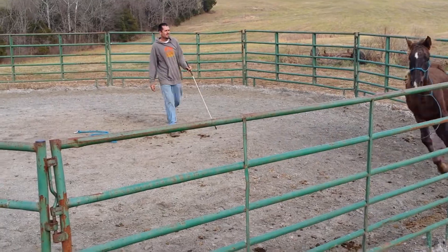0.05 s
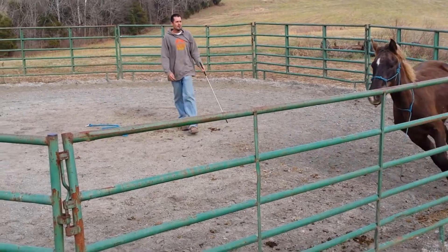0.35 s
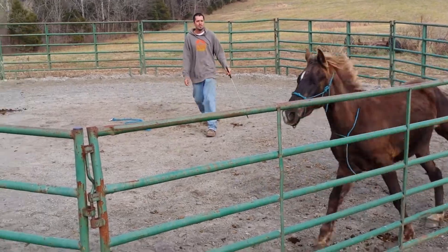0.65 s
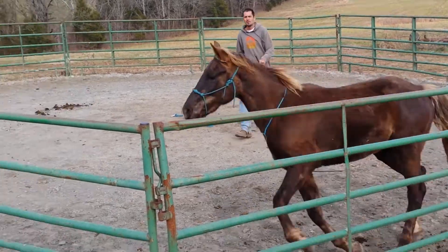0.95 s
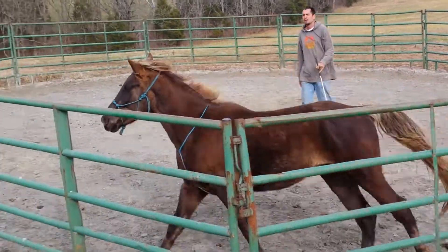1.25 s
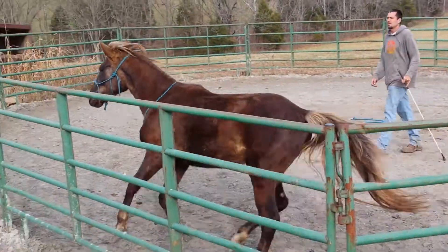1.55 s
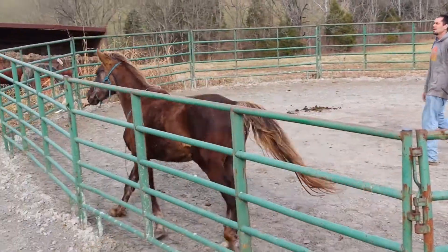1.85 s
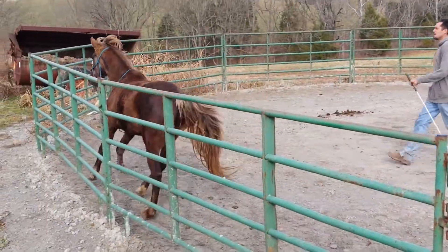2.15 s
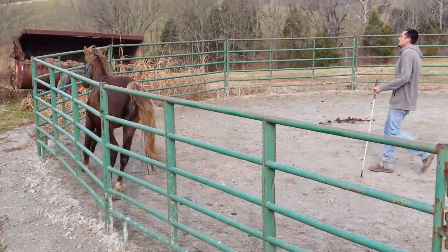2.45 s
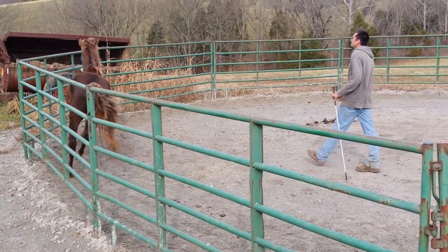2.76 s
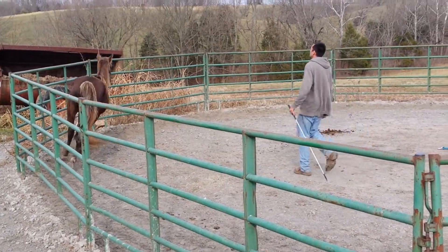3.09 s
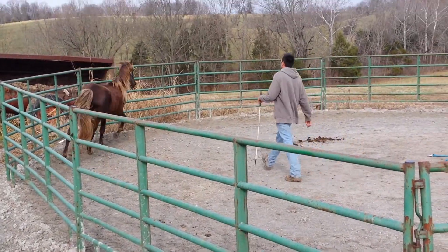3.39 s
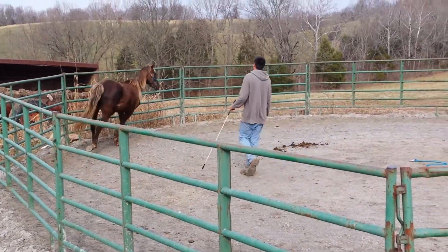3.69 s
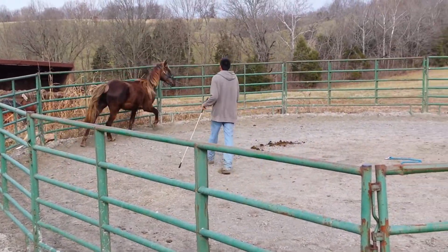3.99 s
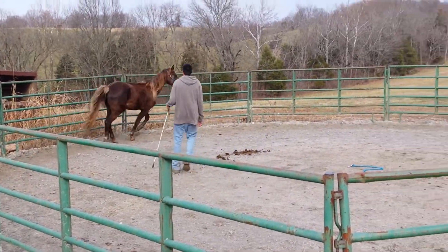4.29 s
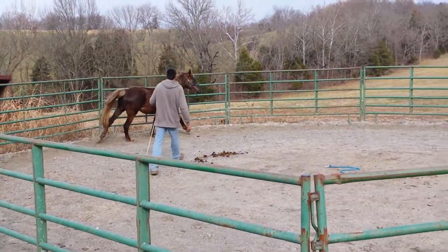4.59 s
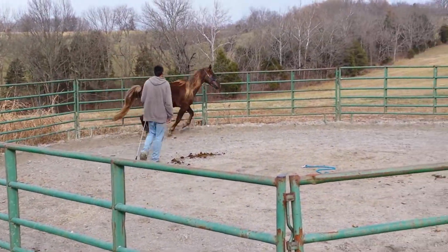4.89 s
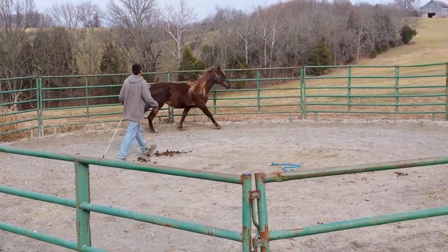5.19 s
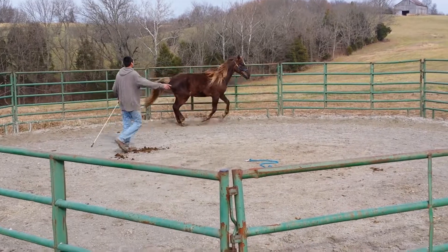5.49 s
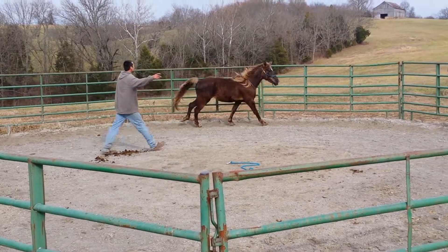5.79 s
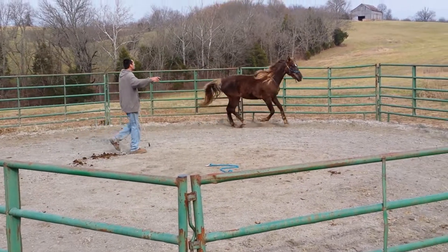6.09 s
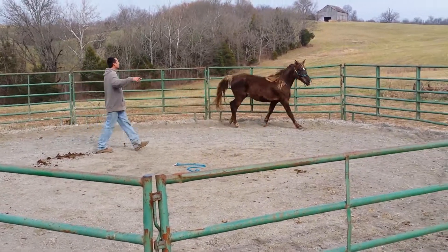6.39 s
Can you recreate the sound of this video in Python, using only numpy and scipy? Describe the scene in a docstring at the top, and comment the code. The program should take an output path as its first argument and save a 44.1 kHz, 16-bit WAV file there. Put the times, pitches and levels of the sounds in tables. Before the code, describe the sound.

Wind gusts rumble on the microphone as hooves crunch past on sand, followed by a long, far-off whinny and one whip snap.

```python
"""A sandy pen below a wooded hillside, heard through the two microphone ports of a hand-held camera.
A horse canters past close by, then moves off to the far side, each hoof thudding down and crunching
through the sand. A lunge whip snaps once. From a distance comes a long falling whinny, a high squeal
and a rough low neigh throbbing together, and the trees echo it. Gusts buffet the ports throughout,
with three short crackles at the start."""
import sys
import numpy as np
from scipy import signal
from scipy.fft import rfft, irfft, next_fast_len
from scipy.io import wavfile
from scipy.ndimage import uniform_filter1d, map_coordinates

SR = 44100
rng = np.random.default_rng(int(sys.argv[2]) if len(sys.argv) > 2 else 0)


def waveform_to_disk(signal):
    """Save audio, clipped to [-1, 1], as 16-bit WAV at the path in sys.argv[1]."""
    frames = np.transpose(np.atleast_2d(signal))
    scaled = np.clip(frames, -1, 1) * 32767
    samples = np.round(scaled).astype(np.int16)
    wavfile.write(sys.argv[1], SR, samples)


N = 293204

# The open air: far rumble, breeze, dry grass. Each row: frequency in Hz, relative level in dB.
FAR_RUMBLE_SPECTRUM = [(20, 2.5), (50, 9), (90, 8), (150, -8.5), (260, -6), (420, -5.5), (750, -23),
                       (1200, -18.5), (3000, -30)]
BREEZE_SPECTRUM = [(200, 7.5), (500, -0.5), (750, -4.5), (950, 0), (1100, -6), (1250, 2), (1380, -10),
                   (1550, -15), (1720, -2.5), (1880, 4), (2020, 1), (2170, 4), (2400, -1.5), (2600, -5),
                   (3600, -10), (6000, -17.5), (12000, -23.5)]
RUSTLE_SPECTRUM = [(1500, -3), (3300, 1), (5500, 1.5), (6600, 3.5), (7700, 13.5), (8800, 4.5),
                   (11000, -2.5), (14500, -11.5)]
# Breeze round the pen; loose sand and dry grass. Each row: time in seconds, relative level in dB.
BREEZE_LEVEL = [(0.0, -61.5), (0.4, -55.5), (0.66, -51.5), (0.82, -67.5), (1.08, -64), (1.2, -54.5),
                (1.86, -63.5), (1.99, -67), (2.4, -73), (2.55, -66), (2.78, -74.5), (3.11, -59.5),
                (3.46, -55), (3.65, -53.5), (3.73, -67), (4.6, -72)]
RUSTLE_LEVEL = [(0.0, -62), (0.64, -56), (0.76, -63), (1.06, -61.5), (1.3, -53), (1.81, -50.5),
                (1.92, -59.5), (2.7, -62), (4.02, -59), (4.49, -63.5), (5.6, -61.5)]
# How alike the open air is at the two ports. Each row: frequency in Hz, correlation from 0 to 1.
AIR_COHERENCE = [(100, 1), (650, 0.88), (1400, 0.16), (2500, 0.0099), (6000, 0.041)]
# Echo of the hillside. Each row: frequency in Hz, t60 (time to fall 60 dB) in seconds.
WOODS_DECAY = [(500, 0.29), (1200, 0.72), (2600, 1.44), (7000, 0.92)]

# Steady push of the wind on each port. Each row: time in seconds, relative level in dB.
PUSH_LEFT = [(0, -20.5), (0.57, -19), (0.63, -45), (1.15, -44.5), (1.36, -38.5), (1.54, -45.5),
             (1.7, -33.5), (2.28, -31), (2.4, -44.5), (3.3, -46), (3.75, -38.5), (4.0, -47), (4.8, -57.5),
             (5.55, -50), (6.2, -34.5)]
PUSH_RIGHT = [(0, -19), (0.379, -23), (0.47, -46), (0.7, -46), (1.1, -31.5), (1.42, -58), (2.0, -48),
              (3.05, -48.5), (3.78, -32.5), (3.9, -38.5), (4.35, -55), (5.68, -49.5), (5.88, -26),
              (6.65, -27)]
# Gusts. Each row: start and hold in seconds, relative level in dB, port (0 left, 1 right).
PORT_GUSTS = [(0.0, 0.056, -12.5, 0), (0.0, 0.041, -33, 1), (0.16, 0.076, -19, 1), (0.268, 0.13, -20.5, 0),
              (0.397, 0.13, -22, 0), (0.524, 0.038, -23.5, 1), (0.672, 0.15, -29, 0), (0.714, .1, -24.5, 1),
              (0.84, 0.046, -25.5, 0), (0.907, 0.044, -26, 0), (0.886, 0.052, -25, 1),
              (0.967, 0.038, -21.5, 1), (1.224, 0.033, -26.5, 1), (1.282, 0.028, -28.5, 0),
              (2.035, 0.047, -26.5, 0), (2.117, 0.042, -21, 0), (2.256, 0.059, -28, 0),
              (3.091, 0.016, -23, 1), (3.12, 0.029, -34, 0), (3.188, 0.073, -21, 1),
              (3.342, 0.089, -30.5, 0), (3.388, 0.053, -24.5, 1), (3.523, 0.024, -21, 0),
              (3.698, 0.023, -16, 1), (3.76, 0.043, -38, 0), (4.029, 0.11, -38, 1),
              (4.409, 0.033, -36.5, 0), (4.903, 0.019, -40, 1), (4.928, 0.024, -18.5, 0),
              (5.03, 0.035, -43, 0), (5.116, 0.058, -33, 1), (5.375, 0.033, -44, 0),
              (5.653, 0.066, -31.5, 0), (5.815, 0.04, -14.5, 1), (5.936, 0.08, -25, 0),
              (5.947, 0.086, -28.5, 1), (6.144, 0.018, -18, 1), (6.255, 0.29, -22, 0),
              (6.309, 0.048, -14.5, 1), (6.538, 0.11, -16, 0), (6.545, 0.039, -18, 1)]
# Single eddies. Each row: peak time and half-width in seconds, level in dB, port (0 left, 1 right).
PORT_PUFFS = [(0.05, 0.0065, -6, 0), (0.166, 0.0064, -18.5, 1), (0.277, 0.0031, -15.5, 0),
              (0.4, 0.0044, -7, 0), (0.424, 0.0053, -8.5, 0), (0.465, 0.0085, -9.5, 0),
              (0.519, 0.0047, -8.5, 0), (0.545, 0.0039, -10.5, 0), (0.771, 0.013, -24.5, 1),
              (3.706, 0.0047, -21, 1), (4.952, 0.0035, -32, 0), (5.856, 0.0033, -36, 1)]
# Large and small turbulence at a port. Each row: frequency in Hz, relative level in dB.
BUFFET_SPECTRUM = [(15, -35), (30, -13.5), (60, 0.5), (110, 4.5), (170, -3), (260, -13.5), (400, -28.5),
                   (650, -51), (1200, -43.5), (3000, -117)]
EDDY_SPECTRUM = [(60, -22.5), (180, 9), (330, 1.5), (500, -9.5), (750, -22.5), (1200, -39), (2500, -66),
                 (6000, -85)]

# Snap of the whip's tip. Each row: start in seconds, level in dB.
WHIP_SNAPS = [(5.1681, -26)]
# Colour of the snap. Each row: frequency in Hz, relative level in dB.
SNAP_SPECTRUM = [(400, -10), (1800, -8), (3500, -16), (5500, -18), (6600, 0), (7300, 12), (8300, 2),
                 (10500, -6.5), (14500, -9)]

# The whinny's high voice. Each row: time in seconds, crest pitch in Hz, relative level in dB,
# dip between crests as a share of the pitch, relative overtone level in dB.
SQUEAL_CONTOUR = [(4.58, 2764, -66, .008, -25), (4.67, 2830, -52, 0, -23), (4.72, 2840, -41, .02, -17),
                  (4.8, 2832, -45.5, .06, -16.5), (4.96, 2817, -46, .12, -6), (5.11, 2720, -51.5, .13, -11),
                  (5.25, 2664, -45.5, .12, -20), (5.4, 2658, -48.5, .16, -12.5), (5.54, 2478, -50, .15, -7),
                  (5.68, 2413, -45, .22, -18.5), (5.82, 2338, -44, .23, -16), (5.96, 2217, -45, .19, -14),
                  (6.1, 2079, -42.5, .15, -15), (6.24, 1901, -44.5, .1, -16), (6.38, 1682, -49, .07, -30),
                  (6.52, 1606, -40, .06, -24), (6.65, 1565, -65, 0.066, -27)]
# Throbs of its low voice. Each row: time in seconds, pitch in Hz, relative level in dB.
NEIGH_THROBS = [(4.58, 580, -88), (4.725, 580, -101), (4.87, 585, -88), (5.02, 577.5, -50.5),
                (5.17, 569, -44), (5.31, 533, -42), (5.45, 521.4, -39.5), (5.595, 505, -39),
                (5.735, 517.4, -38.5), (5.88, 518, -37), (6.02, 510, -37), (6.16, 506.3, -36.5),
                (6.3, 510, -37), (6.445, 519.7, -38.5), (6.585, 518.4, -43.5), (6.72, 510, -56)]
# The throat shapes the neigh, the nose the squeal. Each row: frequency in Hz, gain in dB.
THROAT_RESPONSE = [(300, 2), (560, 4.5), (800, 3.5), (1150, 3), (1400, 0.5), (1800, 0.5), (2300, -6.5),
                   (2650, -14.5), (2950, -14.5), (3400, -3), (4100, -11), (4900, -17), (7000, -3.5),
                   (10000, -10.5), (14000, -53)]
NOSE_RESPONSE = [(700, 4), (1600, 4.5), (2300, 5.5), (2800, -8.5), (3100, 6), (4000, 16), (4550, 2),
                 (5200, 16), (5700, 0), (6200, 13), (7000, 24.5), (8000, -12), (10000, -22)]
# Narrow resonances of the horse's long head. Each entry: frequency in Hz.
HEAD_RESONANCES = [433.5, 542, 664, 980, 1210, 1575, 1830, 2120, 2370]

# Soft hollow knocks nearby. Each row: start in seconds, pitch in Hz, level in dB, t60 in seconds.
HOLLOW_KNOCKS = [(0.803, 402, -21.5, 0.034), (1.173, 445, -33.5, 0.11), (1.345, 380, -30.5, 0.053),
                 (2.357, 345, -28.5, 0.017), (2.481, 317, -30, 0.025), (4.443, 430, -43, 0.031),
                 (4.543, 306, -35.5, 0.068), (4.606, 275, -28.5, 0.03), (5.205, 506, -23, 0.007)]
# Flung pebbles. Each row: start in seconds, relative level in dB, pitch in Hz, t60 in seconds.
PEBBLE_TICKS = [(2.9384, -27, 7200, 0.018), (2.94, -35, 5160, .012), (3.1338, -30, 6300, 0.016),
                (3.681, -35, 8800, 0.028), (3.759, -34, 8100, .03), (3.8276, -39, 9000, .02),
                (3.839, -30.5, 8800, 0.06), (3.954, -30.5, 8560, 0.084), (4.12, -37, 7500, .04),
                (4.1465, -30, 7700, .025), (4.255, -34, 7550, 0.045), (4.345, -33, 8700, 0.028),
                (4.9244, -27, 8800, 0.031), (5.1445, -31, 7240, 0.081)]
# A hoof twisting in sand. Each row: peak time and half-width in seconds, pitch in Hz,
# glide in Hz a second, level in dB.
SAND_SQUEAKS = [(2.18, 0.0085, 810, 3400, -41.5)]
# Three short crackles of wind on the ports, then hoof falls and scuffs. Each row: start, rise and
# length in seconds, relative levels of crunch, grit and thud in dB, ring pitch in Hz.
CRACKLES_AND_HOOVES = [(0.037, .001, 0.013, -39.5, -49, -49, 870),
                       (0.152, .002, .005, -43, -44.5, -32, 2420),
                       (0.272, 0.0037, 0.019, -41, -47, -54, 1030),
                       (0.573, .005, 0.017, -45, -47, -65, 2100),
                       (0.67, .008, 0.029, -44.5, -45, -57, 2600),
                       (0.711, 0.0051, .027, -47, -47, -60, 1330),
                       (0.8, 0.00086, 0.022, -35.5, -43.5, -53, 970),
                       (1.06, .0003, 0.0018, -29.5, -29.5, -50, 1350),
                       (1.106, 0.008, 0.029, -36, -42, -61, 2630),
                       (1.22, .004, 0.046, -35, -38.5, -47, 2130),
                       (1.3413, 0.0013, 0.03, -31.5, -32.5, -41, 1310),
                       (1.401, 0.0074, 0.022, -45, -48, -61, 1680),
                       (1.585, 0.0053, 0.013, -45.5, -44, -62, 1250),
                       (1.623, 0.0041, 0.042, -35.5, -32, -57, 2470),
                       (1.707, 0.00027, .001, -42.5, -36, -59, 2540),
                       (1.748, 0.0037, 0.018, -36.5, -37, -54, 2170),
                       (1.777, .002, 0.021, -35, -36, -56, 1140), (1.842, .005, 0.018, -43, -41, -60, 1310),
                       (1.902, 0.0018, 0.02, -38.5, -42.5, -33.5, 1130),
                       (1.942, .007, 0.044, -48.5, -50, -60, 1240),
                       (2.019, 0.0037, 0.015, -50.5, -48, -52, 2190),
                       (2.123, .0006, 0.0016, -36.5, -55, -67, 1160),
                       (2.144, .002, 0.0078, -45, -47, -53, 1180),
                       (2.18, 0.0048, .024, -30, -34, -46, 1240),
                       (2.263, 0.0018, 0.0096, -38, -44, -37, 890),
                       (2.311, 0.0018, 0.0073, -33, -36, -38, 1140),
                       (2.35, 0.011, .032, -37.5, -47, -55, 2560),
                       (2.404, 0.0045, .015, -48, -49, -43, 1170),
                       (2.477, 0.0064, .026, -42.5, -49.5, -58, 1260),
                       (2.75, 0.0023, 0.026, -44.5, -49.5, -59, 2120),
                       (2.767, 0.0029, 0.01, -34.5, -42.5, -36, 2200),
                       (2.895, .002, 0.0077, -44, -56, -46, 930),
                       (2.939, 0.00088, 0.0023, -37.5, -46, -40, 1200),
                       (3.044, 0.0015, .007, -44, -50.5, -38, 1020),
                       (3.318, 0.0059, 0.017, -43, -45, -38, 1210),
                       (3.447, .004, 0.014, -39, -48, -45, 1030),
                       (3.501, .001, .004, -40.5, -51, -41, 1100),
                       (3.872, 0.01, 0.028, -44.5, -48, -29.5, 1090),
                       (4.06, 0.0045, 0.019, -51, -50.5, -37, 840),
                       (4.188, 0.0031, 0.031, -46.5, -53, -41, 2250),
                       (4.438, 0.005, 0.02, -50, -45.5, -35.5, 830),
                       (4.61, .002, .01, -54.5, -72, -52, 840), (4.774, .005, 0.015, -46, -67, -58, 870),
                       (6.152, 0.0046, .017, -52, -43.5, -55, 1790)]
# Coarse crunch and fine grit. Each row: frequency in Hz, relative level in dB.
CRUNCH_SPECTRUM = [(120, -27), (300, 13.5), (550, -4.5), (800, 5), (1200, 9.5), (1700, 4), (2300, 7),
                   (3200, -1), (4500, -4.5), (7000, -28)]
GRIT_SPECTRUM = [(2000, -23), (3800, -7.5), (5500, -0.5), (6600, 4), (7600, 9.5), (8700, 1), (11000, -2.5),
                 (14500, -8.5)]
# The horse's way round the pen. Each row: time in seconds, left over right in dB, left lag in ms.
HORSE_PATH = [(0, 0, -0.15), (1.1, -3.5, -0.075), (1.25, -0.5, 0.06), (1.65, -3, 0.053), (2.2, -1, .08),
              (2.9, 0.5, 0.13), (4.4, -0.5, 0.055)]

# The ports colour the sound differently. Each row: frequency in Hz, left over right in dB.
PORT_BALANCE = [(700, 1), (1300, 3), (2000, -0.5), (3300, -2.5), (4500, -0.5), (6100, 4), (7500, -1),
                (8900, 0.5), (10200, -6.5), (14500, -4.5)]


def amp(db):
    """Decibels as an amplitude factor."""
    return 10 ** (np.asarray(db) / 20)


def unit(x):
    """x scaled to rms 1."""
    return x / np.sqrt(np.mean(x ** 2) + 1e-20)


def along(points, hz):
    """Read (Hz, value) points on a log frequency axis."""
    point_hz, values = np.transpose(points)
    return np.interp(np.log(hz + 1), np.log(point_hz + 1), values)


def curves(rows):
    """One value per sample for each column after the time."""
    times, *columns = np.transpose(rows)
    return [np.interp(np.arange(N) / SR, times, column) for column in columns]


def wobble(rate):
    """A smooth random curve of rms 1, rate knots a second."""
    return unit(map_coordinates(rng.standard_normal(N // 8), [np.arange(N) * rate / SR], mode="wrap"))


def filtered(x, response):
    """x through a zero-phase filter, its gain a function of Hz."""
    size = next_fast_len(N + SR // 2)
    return irfft(rfft(x, size) * response(np.fft.rfftfreq(size, 1 / SR)), size)[..., :N]


def coloured(x, spectrum, size=2048):
    """x through a causal filter of unit energy with the given spectrum."""
    cepstrum = irfft(np.log(amp(along(spectrum, np.fft.rfftfreq(size, 1 / SR)))))
    cepstrum[1:size // 2] *= 2  # fold to minimum phase
    cepstrum[size // 2 + 1:] = 0
    ring = irfft(np.exp(rfft(cepstrum)))
    return signal.fftconvolve(np.atleast_2d(x), ring[None] / np.linalg.norm(ring), axes=1)[:, :N]


def resonance(x, hz, q):
    """The band of x round hz."""
    return signal.lfilter(*signal.iirpeak(hz, q, SR), x)


def even(x, size):
    """x with its swells slower than size samples taken out."""
    return x / np.sqrt(np.abs(uniform_filter1d(uniform_filter1d(x ** 2, size), size)) + 1e-9)


def noise(spectrum):
    """Mono noise of rms 1."""
    return unit(filtered(rng.standard_normal(N), lambda hz: amp(along(spectrum, hz))))


def diffuse(spectrum):
    """Stereo noise of rms 1 that reaches the microphone from all sides."""
    def mid_side_gains(hz):
        angle = np.arccos(np.clip(along(AIR_COHERENCE, hz), -1, 1)) / 2
        return amp(along(spectrum, hz)) * [np.cos(angle), np.sin(angle)]
    mid, side = filtered(rng.standard_normal((2, N)), mid_side_gains)
    return unit(np.array([mid + side, mid - side]))


def grains(spiky_db, spread):
    """Stereo crackle of rms 1: tiny impacts of unequal size, partly scattered."""
    direct = rng.standard_normal(N)
    return unit((direct + spread * rng.standard_normal((2, N))) * amp(spiky_db * wobble(1100)))


def lag_left(x, samples):
    """The sound reaches the left port late, or early if samples is negative."""
    return np.array([np.roll(x[0], samples), x[1]])


def outdoors(rustle_gain_db=5.0, breeze_gain_db=8.5):
    """All round the microphone: a fine rustle, the hiss of the breeze and a far rumble."""
    rustle_db = curves(RUSTLE_LEVEL)[0] + rustle_gain_db
    breeze_db = curves(BREEZE_LEVEL)[0] + breeze_gain_db
    rustle = diffuse(RUSTLE_SPECTRUM) * amp(rustle_db + 1.2 * wobble(310)) * amp([[-1.8], [1.5]])
    breeze = diffuse(BREEZE_SPECTRUM) * amp(breeze_db + 0.82 * wobble(35)) * amp([[-1], [1]])
    rumble = amp(-50.5 + 1.5 * wobble(23)) * diffuse(FAR_RUMBLE_SPECTRUM)
    return rustle + breeze + rumble


def woods(x):
    """The trees on the hillside scatter the sound back in a smooth tail."""
    scatter = diffuse([(100, 0)])[:, :SR]  # one second, flat spectrum
    hz, t, bands = signal.stft(scatter, SR, nperseg=256)
    decay = amp(-60 * t / along(WOODS_DECAY, hz)[:, None])
    _, tail = signal.istft(bands * decay, SR, nperseg=256)
    return signal.fftconvolve(x[None], tail / np.linalg.norm(tail[0]), axes=1)[:, :N]


def eddies():
    """Small-scale turbulence of rms 1."""
    return even(noise(EDDY_SPECTRUM), size=350)


def wind_level(push, port, rise_s=0.014, fall_s=0.0085, push_flutter_db=3.2, gust_flutter_db=0.5):
    """Wind on one port in dB: a fluttering steady push, and gusts that rise, hold and fall away."""
    t = np.arange(SR // 2) / SR
    gusts = np.zeros(N + SR)
    for start, hold, db, side in PORT_GUSTS:
        if round(side) == port:
            shape = np.minimum(t / rise_s, 1) * np.exp(-np.maximum(t - hold, 0) / fall_s)
            gusts[round(start * SR):][:len(t)] += amp(db) * shape
    flutter = wobble(26)
    steady = amp(curves(push)[0] + push_flutter_db * flutter)
    return 20 * np.log10(np.hypot(steady, gusts[:N] * amp(gust_flutter_db * flutter)))


def buffeting(level_db, gain_db=1.07, eddy_db=-13, eddy_growth=0.99):
    """Turbulence right on one port: stronger gusts shed smaller eddies and sound brighter."""
    rumble = even(noise(BUFFET_SPECTRUM), size=700)
    swirl = eddies() * amp(eddy_db + 5.4 * wobble(70) + eddy_growth * (level_db + 16.5))
    return amp(level_db + gain_db) * (rumble + swirl)


def puffs():
    """Single eddies thump on a port."""
    t, shape = np.arange(N) / SR, np.zeros((2, N))
    for peak, width, db, port in PORT_PUFFS:
        shape[round(port)] += amp(db) * np.exp(-((t - peak) / width) ** 2 / 2)
    return shape * np.array([eddies(), eddies()])


def knocks(q=2.5, rise_s=0.0014):
    """Dull contacts nearby: a short push into one broad low resonance."""
    t, out = np.arange(SR // 3) / SR, np.zeros(N)
    for start, hz, db, t60 in HOLLOW_KNOCKS:
        band = resonance(resonance(rng.standard_normal(SR // 2), hz, q), hz, q)
        ring = even(band, size=300)[-len(t):]
        out[round(start * SR):][:len(t)] += ring * (1 - np.exp(-t / rise_s)) * amp(db - 60 * t / t60)
    return out


def whip(crack_t60=0.12, tail_db=-8, tail_t60=0.16):
    """The whip's tip, close by: a bright snap with a short sizzle."""
    t, shape = np.arange(N) / SR, np.zeros(N)
    for start, db in WHIP_SNAPS:
        age = np.maximum(t - start, 0)
        shape += (t > start) * amp(db) * (amp(-60 * age / crack_t60) + amp(tail_db - 60 * age / tail_t60))
    return lag_left(coloured(shape * grains(spiky_db=-1.0, spread=1.0), SNAP_SPECTRUM), samples=1)


def neigh(beat, rough, sag=0.14, throb_db=12, head_width_hz=125, head_bypass=0.56):
    """The low voice: rasping pulses slide down in pitch through every throb and ring the head."""
    pitch_hz, level_db = curves(NEIGH_THROBS)
    jitter = np.sqrt(rough) * (0.14 * wobble(260) + 0.09 * wobble(45))
    phase = 2 * np.pi * np.cumsum(pitch_hz * (1 - sag * np.sin(beat) + jitter)) / SR
    pulses = unit(sum(np.cos(k * phase) for k in range(1, 18)))
    rasp = unit((1 + np.cos(phase)) * rng.standard_normal(N))
    throat = coloured(pulses + np.sqrt(rough) * rasp, THROAT_RESPONSE)[0]
    head = sum(resonance(throat, hz, hz / head_width_hz) for hz in HEAD_RESONANCES)
    trough_db = throb_db * (1 - 0.5 * rough) * (np.cos(beat) - 1)
    return unit(head_bypass * throat + head) * amp(level_db + trough_db), phase


def squeal(t, beat, rough, neigh_phase, lead_rad=2.2, sideband_gain=0.44):
    """The high voice, out through the nose: it holds a crest ahead of each throb, then swoops down."""
    _, level_db, dip, overtone_db = curves(SQUEAL_CONTOUR)
    throb_s = np.diff(np.transpose(NEIGH_THROBS)[0]).mean()
    held_time = t - np.sin(beat + lead_rad) * throb_s / (2 * np.pi)  # stalls on each crest
    crest_hz = np.interp(held_time, *np.transpose(SQUEAL_CONTOUR)[:2])
    swoop = (1 - np.tanh(3 * (np.cos(beat + lead_rad) + 0.25))) / 2
    jitter = 0.005 * wobble(14) + (0.011 + 0.005 * rough) * wobble(140)
    phase = 2 * np.pi * np.cumsum(crest_hz * (1 - dip * swoop + jitter)) / SR
    second = amp(overtone_db - 1 + 4.5 * wobble(30)) * np.sin(2 * phase)
    third = amp(overtone_db - 7 + 4.5 * wobble(30)) * np.sin(3 * phase)
    # the low voice modulates the high one; the throat passes the lower sideband
    sideband = sideband_gain * rough * np.sin(phase - neigh_phase)
    voice = np.sin(phase) + amp(-18 * swoop) * (second + third) + sideband
    voice *= amp(level_db - 4.5 + 1.9 * wobble(60))
    return filtered(voice, lambda hz: amp(along(NOSE_RESPONSE, hz)))


def whinny(hoarse_from_s=4.85, hoarse_per_s=0.7, hoarse_most=0.88):
    """Two voices at once, shaken by the same throbs and turning from clear to hoarse."""
    t = np.arange(N) / SR
    rough = np.clip(hoarse_per_s * (t - hoarse_from_s), 0.05, hoarse_most)
    throb_times = np.transpose(NEIGH_THROBS)[0]
    beat = 2 * np.pi * np.interp(t, throb_times, np.arange(len(throb_times)))  # one turn a throb
    low_voice, low_phase = neigh(beat, rough)
    return (t > SQUEAL_CONTOUR[0][0]) * (low_voice + squeal(t, beat, rough, low_phase))


def pebbles(tick_db=-12, tick_t60=0.022, ring_db=-5):
    """Small stones land with a short bright tick, each ringing at its own pitch."""
    t, out = np.arange(SR // 10) / SR, np.zeros((2, N))
    sandy = coloured(grains(spiky_db=9.5, spread=1.0), GRIT_SPECTRUM)
    for start, db, hz, t60 in PEBBLE_TICKS:
        span = slice(round(start * SR), round(start * SR) + len(t))
        drift = 0.02 * np.cumsum(rng.standard_normal(len(t)))
        ring = amp(ring_db - 60 * t / t60) * np.sin(2 * np.pi * hz * t + drift)
        tick = amp(tick_db - 60 * t / tick_t60) * sandy[:, span]
        out[:, span] += amp(db) * (tick + ring)
    return lag_left(out, samples=2)


def squeaks():
    """Packed sand gives a short rising squeak under a twisting hoof."""
    out = np.zeros(N)
    for peak, width, hz, glide, db in SAND_SQUEAKS:
        age = np.arange(N) / SR - peak
        phase = 2 * np.pi * (hz + glide * age / 2) * age + 0.3 * wobble(200)
        out += amp(db) * np.exp(-(age / width) ** 2 / 2) * np.sin(phase)
    return out


def crackles_and_hooves(fade_db=6.0, settle_t60=0.065, spray_db=-19, spray_t60=0.43,
                        ring_gain=1.3, ring_q=7, thud_hz=600, thud_t60=0.071):
    """Wind crackles on the ports; then each hoof thuds and slides, crushing sand that rings its wall."""
    crunch, grit, thuds = np.zeros((3, 2, N + SR))
    t = np.arange(SR // 2) / SR
    path_s, path_db, path_ms = np.transpose(HORSE_PATH)
    coarse = even(grains(spiky_db=2.5, spread=0.31), size=400)
    fine = even(grains(spiky_db=-0.5, spread=1.0), size=400)
    lumps = unit(amp(2.8 * wobble(320)))
    dull = even(resonance(resonance(rng.standard_normal(N), thud_hz, q=1), thud_hz, q=1), size=250)
    offsets = rng.integers(0, N - len(t), len(CRACKLES_AND_HOOVES))
    for row, offset in zip(CRACKLES_AND_HOOVES, offsets):
        start, rise, length, crunch_db, grit_db, thud_db, ring_hz = row
        span = slice(round(start * SR), round(start * SR) + len(t))
        patch = slice(offset, offset + len(t))
        pan_db = np.interp(start, path_s, path_db)
        pan = amp([[pan_db / 2], [-pan_db / 2]])
        lag = round(np.interp(start, path_s, path_ms) * SR / 1000)
        onset = 1 - np.exp(-t / rise)
        press = onset * amp(4.5 - fade_db * np.minimum(t / length, 1)) * lumps[patch]
        # a quick decay and a faint tail: after a hoof, kicked-up sand pattering down
        after = np.maximum(t - length, 0)
        shape = press * np.hypot(amp(-60 * after / settle_t60), amp(spray_db - 60 * after / spray_t60))
        burst = amp(crunch_db) * pan * shape * coarse[:, patch]
        weight = onset * amp(thud_db - 4.0 - 60 * t / thud_t60)
        crunch[:, span] += lag_left(burst + ring_gain * resonance(burst, ring_hz, ring_q), lag)
        grit[:, span] += lag_left(amp(grit_db) * pan * shape * fine[:, patch], lag)
        thuds[:, span] += lag_left(pan * weight * dull[patch], lag)
    grainy = amp(-3.5) * coloured(crunch, CRUNCH_SPECTRUM) + amp(0.86) * coloured(grit, GRIT_SPECTRUM)
    return grainy + thuds[:, :N]


def scene():
    """Hooves and whip close by, the whinny far off and a little to the right, wind on the ports."""
    near = crackles_and_hooves() + pebbles() + squeaks() + whip() + knocks()
    call = whinny()
    far = (amp(-6.0) * call + amp(1.48) * woods(call)) * amp([[-1.5], [1.5]])
    wind_left = buffeting(wind_level(PUSH_LEFT, port=0))
    wind_right = buffeting(wind_level(PUSH_RIGHT, port=1))
    wind = np.array([wind_left, wind_right]) + puffs()
    near_echo = amp(-17.0) * woods(near.mean(axis=0))
    return outdoors() + wind + near_echo + far + near


def record(dry, top_hz=14750):
    """Each port has its own colour; the camera rounds off the peaks and keeps nothing above top_hz."""
    ports = filtered(dry, lambda hz: np.sqrt(2 / (1 + amp(along(PORT_BALANCE, hz) * [[-2], [2]]))))
    rounded = ports / (1 + ports ** 6) ** (1 / 6)
    return filtered(rounded, lambda hz: hz < top_hz)


dry = scene()
out = record(dry)
waveform_to_disk(out)
```